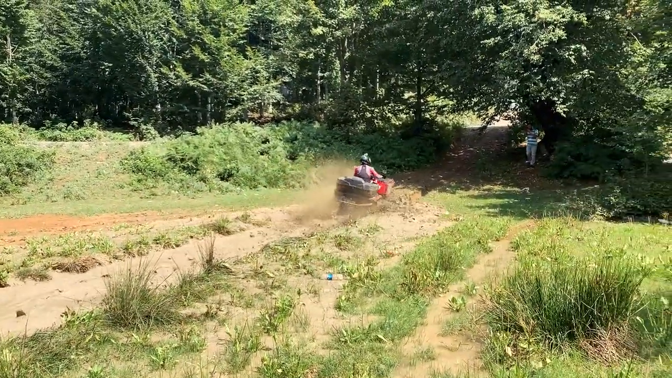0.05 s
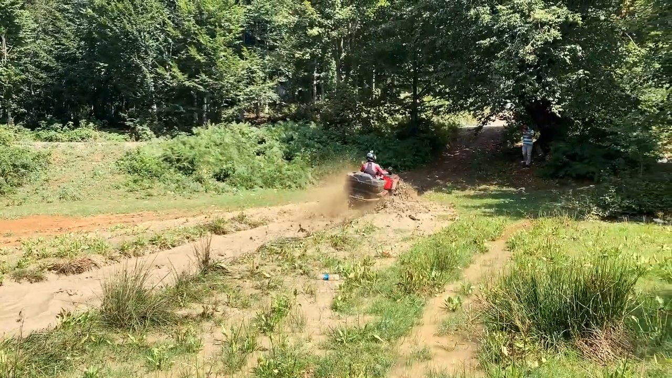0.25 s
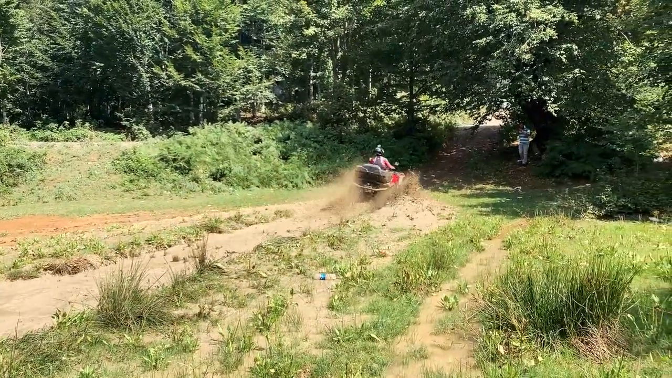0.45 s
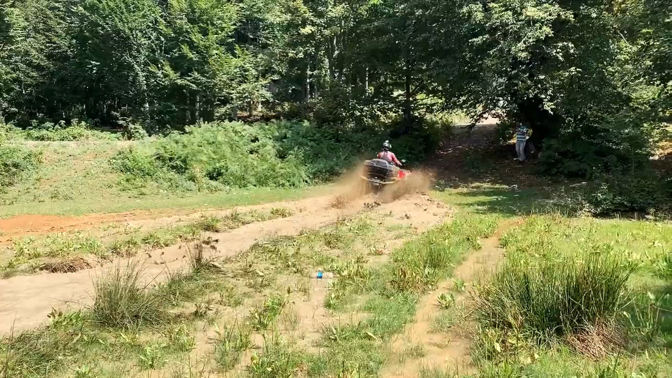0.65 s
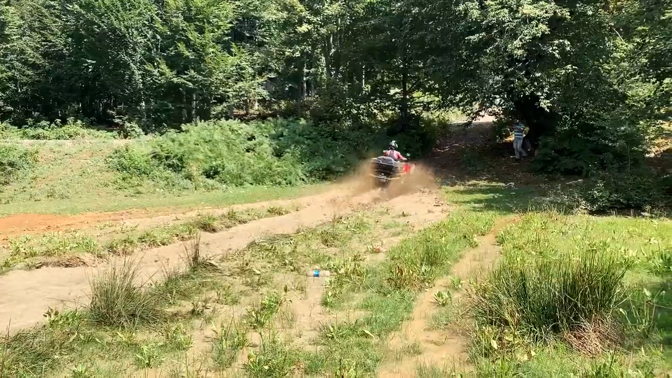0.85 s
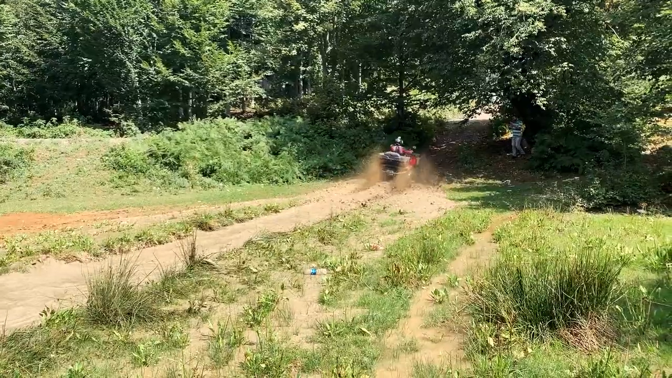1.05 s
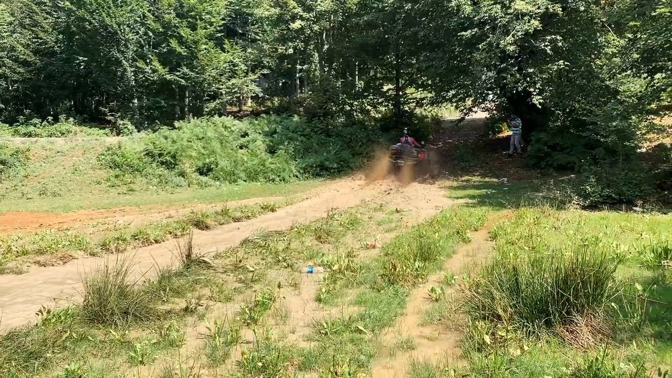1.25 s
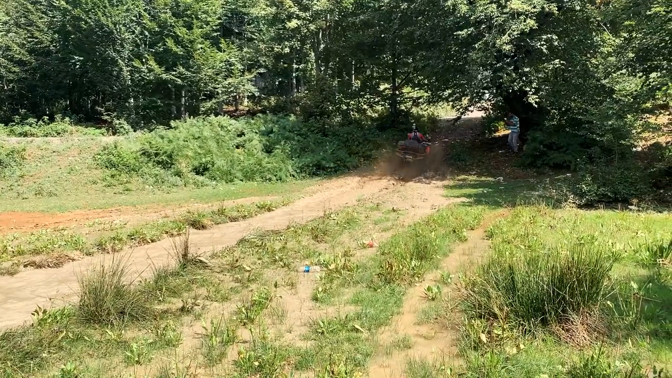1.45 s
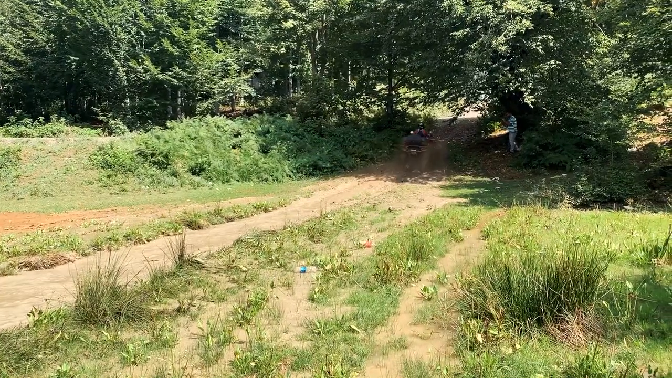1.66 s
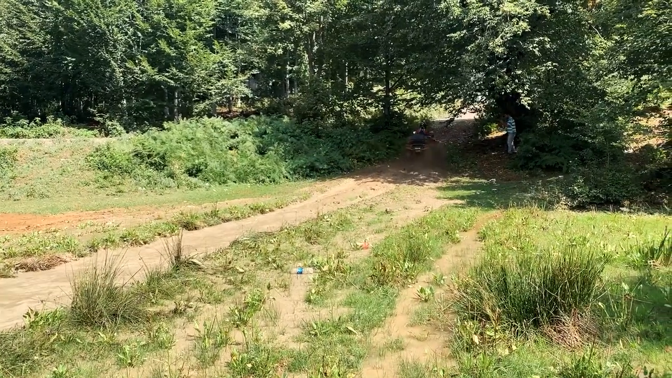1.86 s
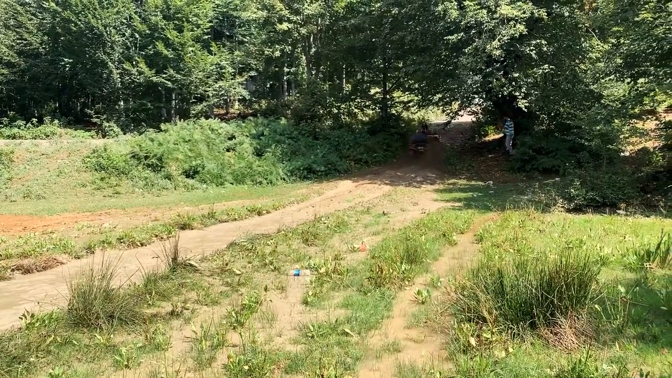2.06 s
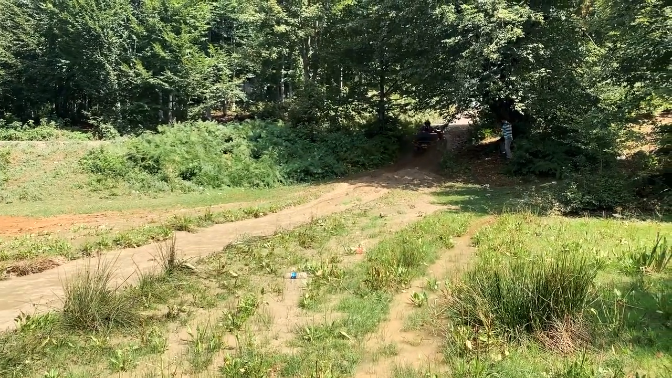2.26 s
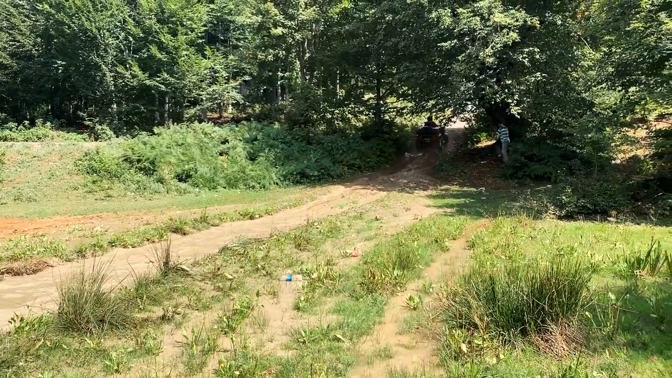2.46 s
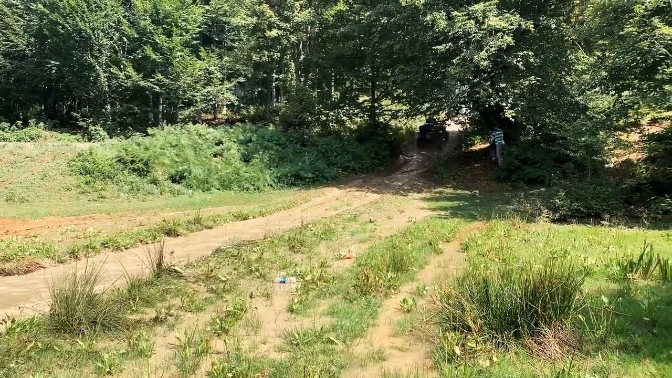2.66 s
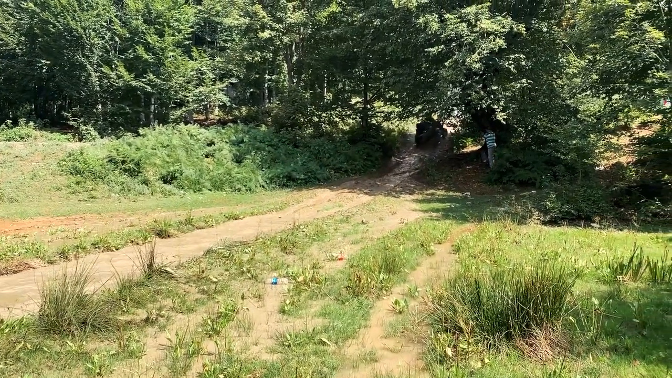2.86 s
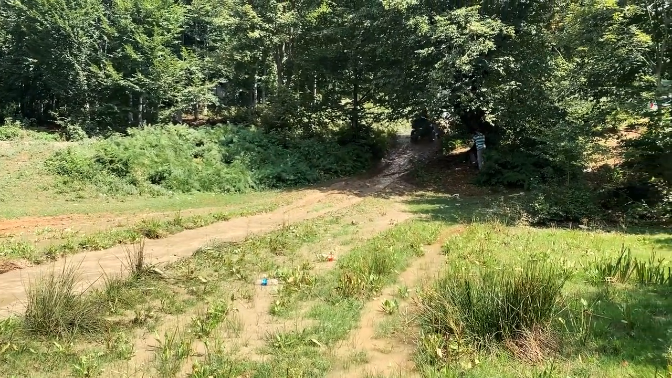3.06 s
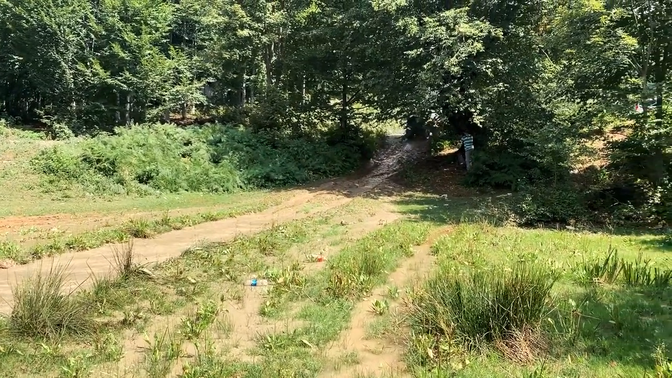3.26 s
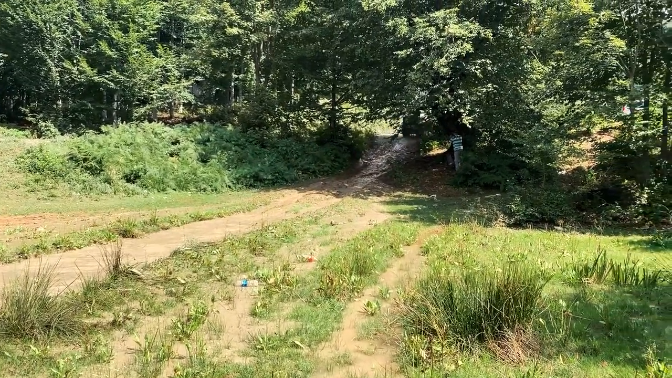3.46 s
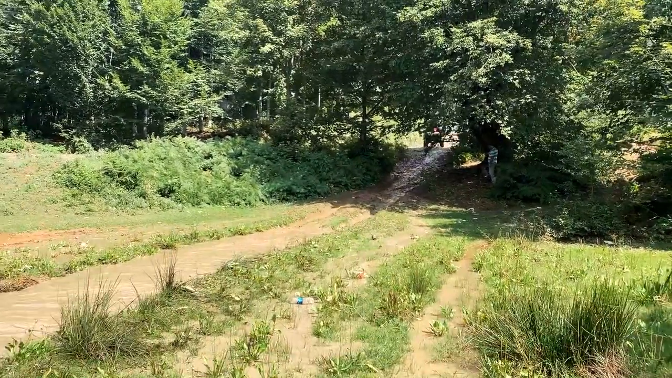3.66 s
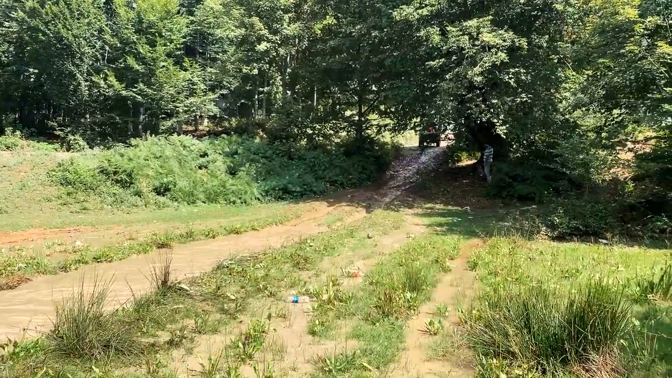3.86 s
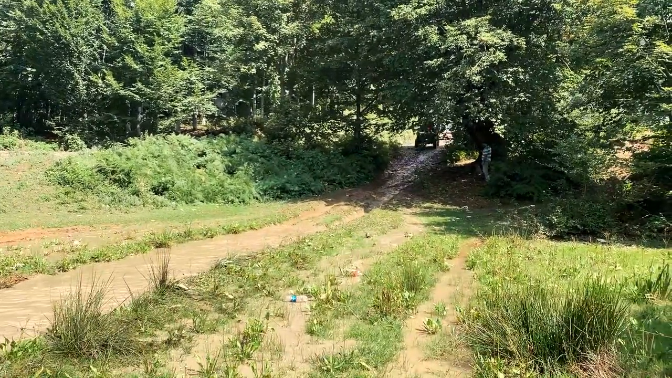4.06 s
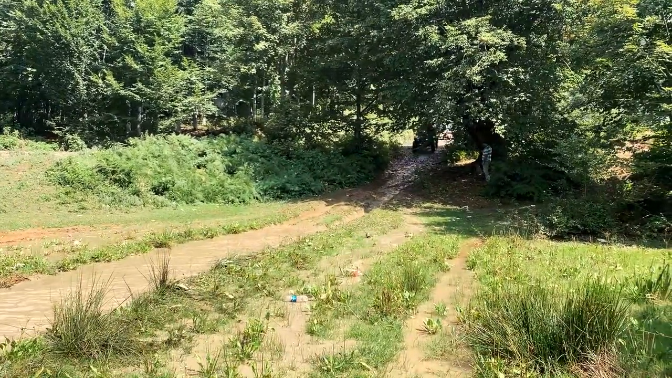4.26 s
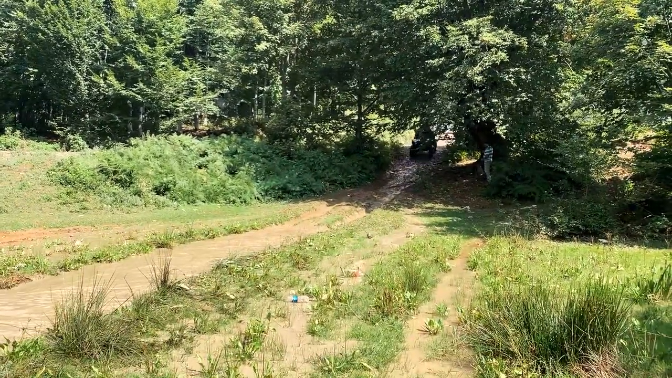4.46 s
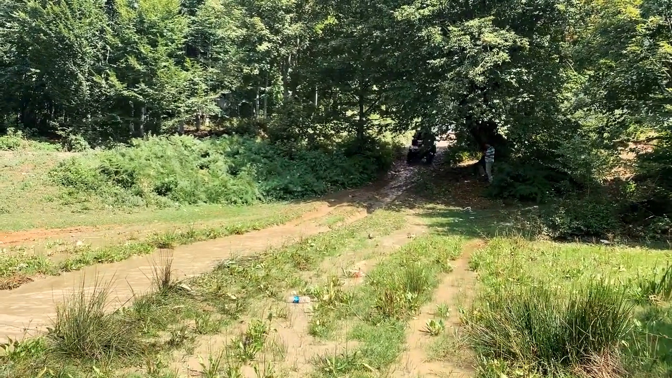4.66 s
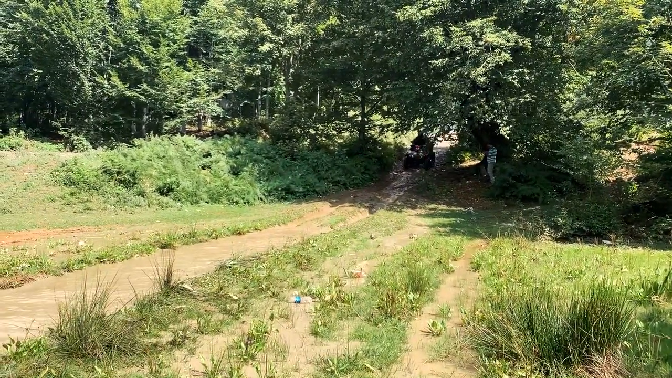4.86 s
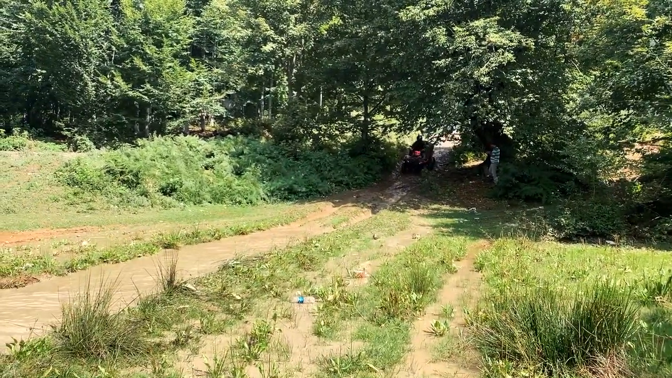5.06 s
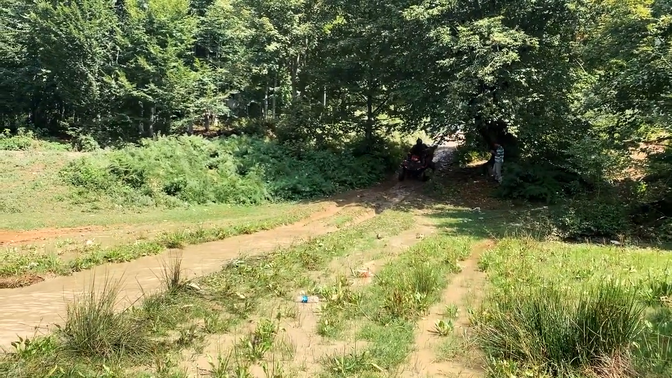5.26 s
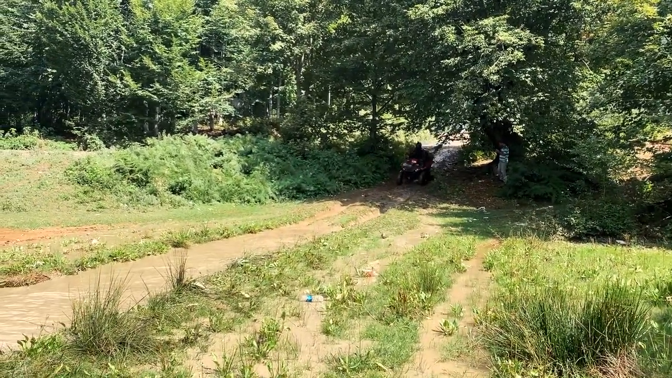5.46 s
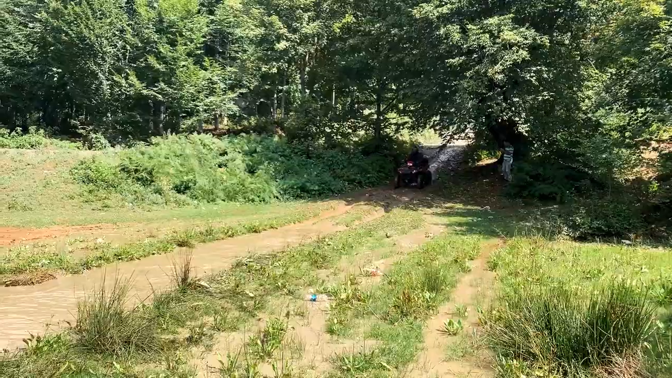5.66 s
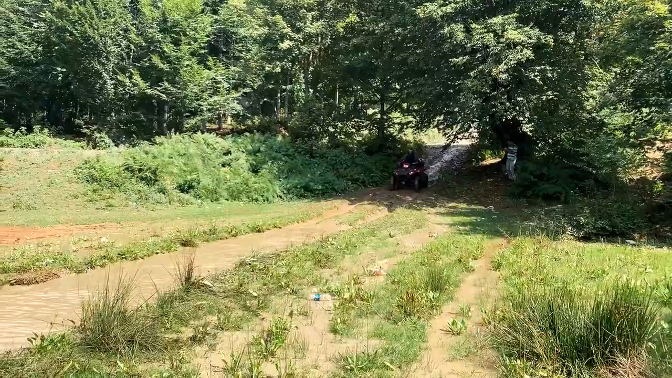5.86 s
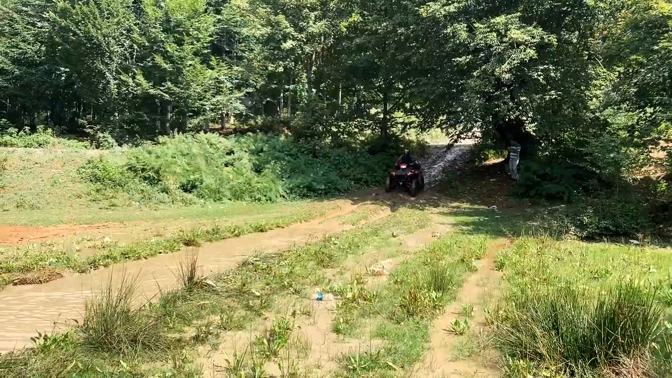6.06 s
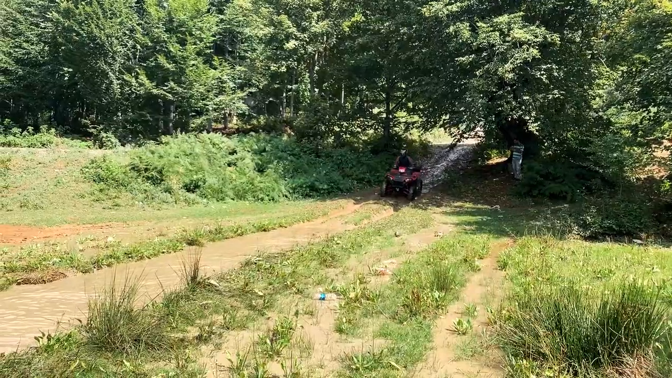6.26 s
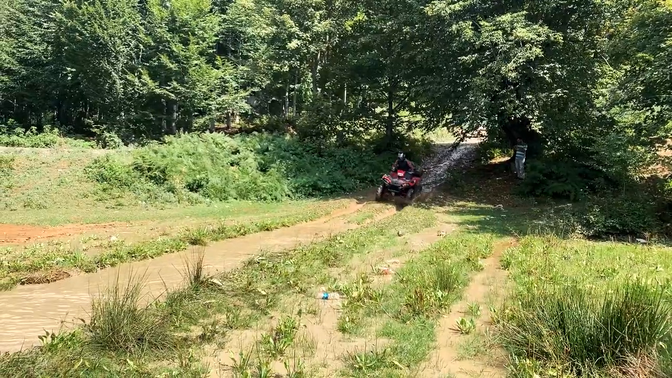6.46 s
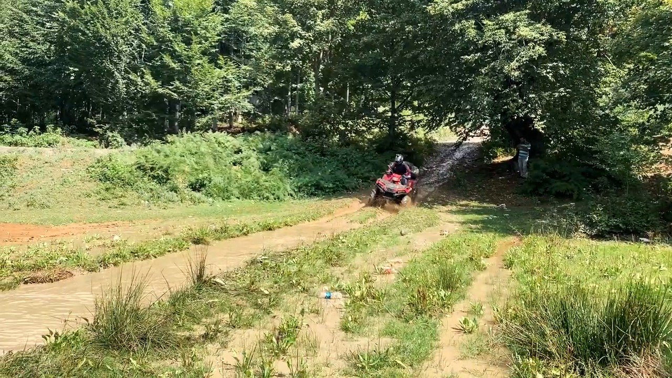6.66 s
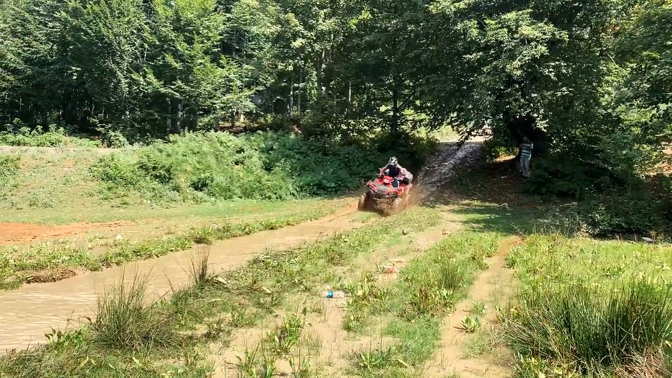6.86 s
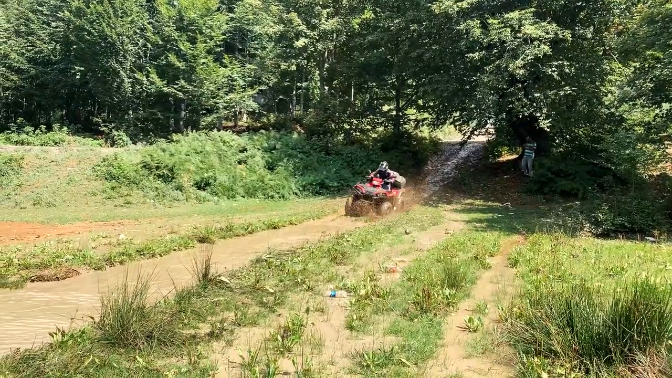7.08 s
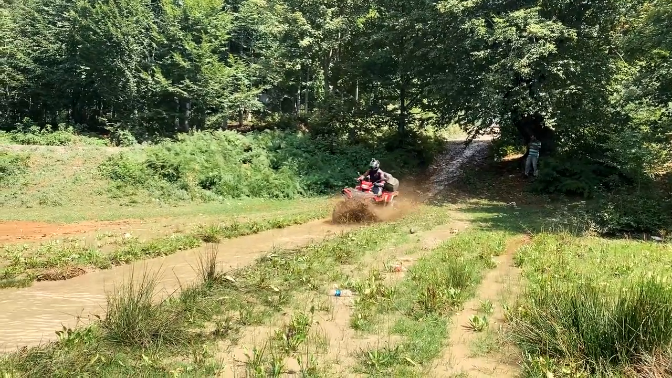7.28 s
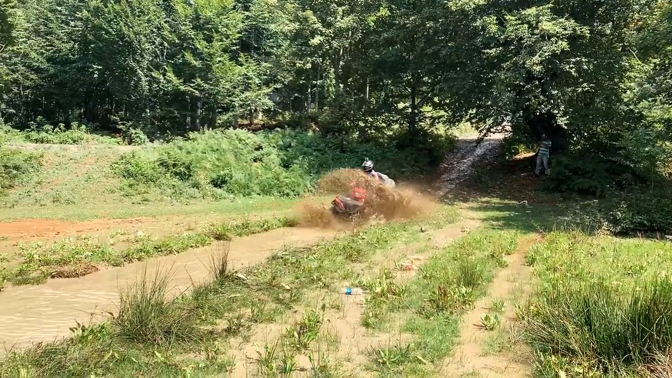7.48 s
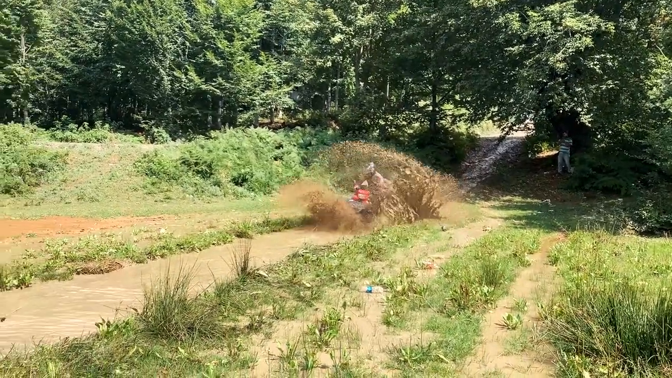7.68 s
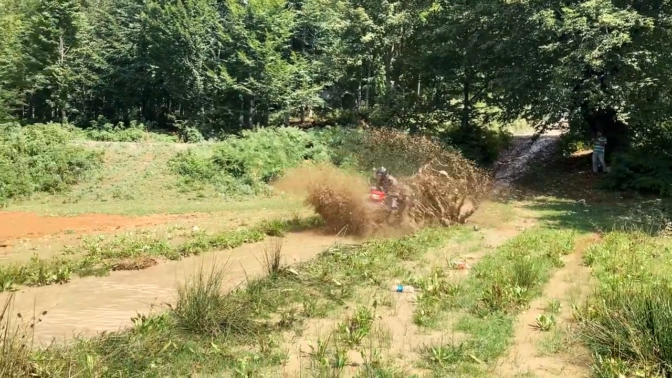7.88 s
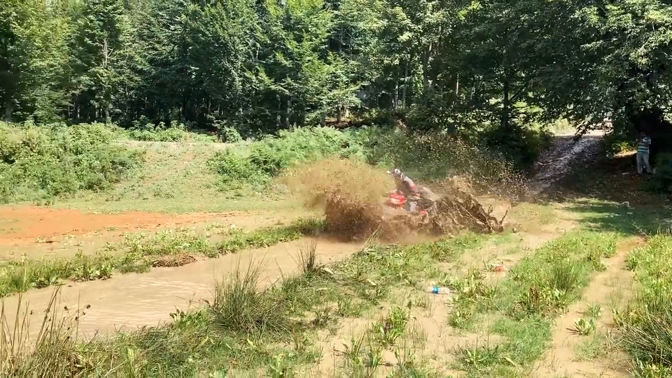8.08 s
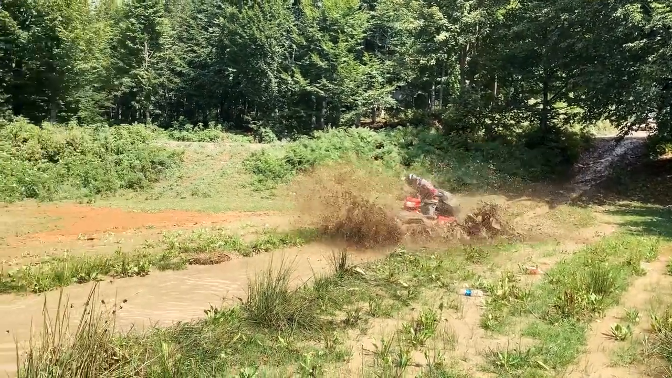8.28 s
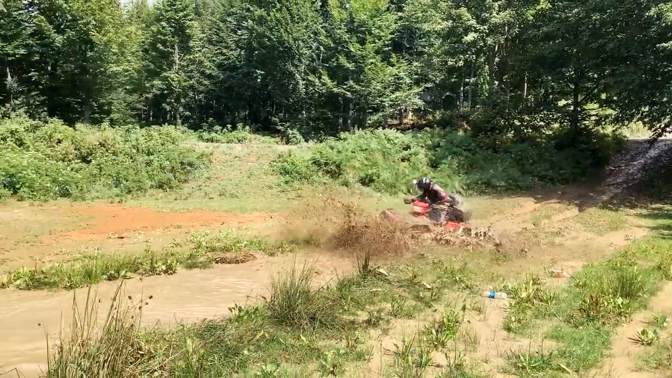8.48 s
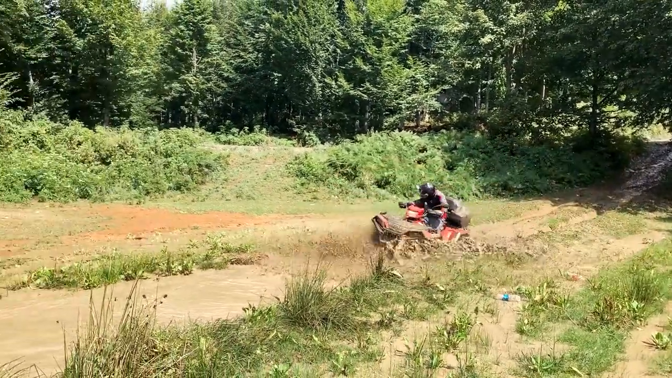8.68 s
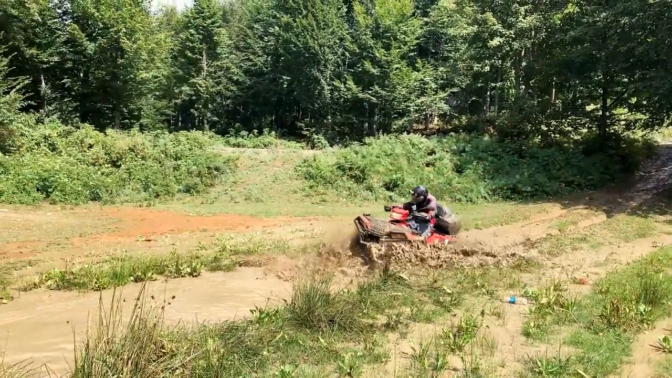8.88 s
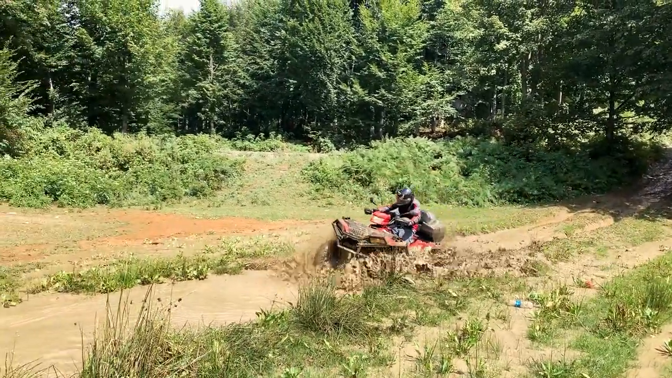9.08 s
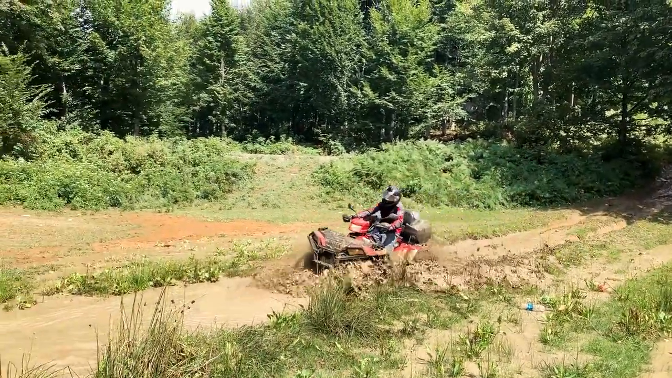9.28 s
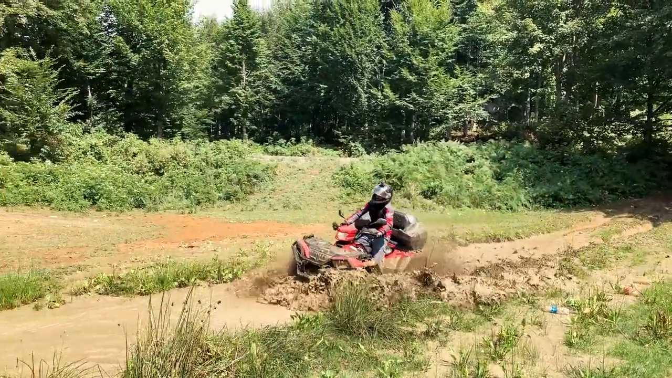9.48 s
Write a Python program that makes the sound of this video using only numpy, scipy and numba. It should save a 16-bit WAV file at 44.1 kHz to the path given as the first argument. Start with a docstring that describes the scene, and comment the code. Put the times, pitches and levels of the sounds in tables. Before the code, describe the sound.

A four-stroke, two-cylinder quad bike is heard from a phone in a forest clearing. From 0 to 1.6 s it pulls away in raspy, high-revving bursts, with barking throttle lifts near 0.5 and 1.25 s, hissing exhaust, tinny rattle and low mud churn; dull thuds fall at 1.2 and 1.6 s. Revs step down from 1.7 to 2.8 s as it recedes, with small splutters near 2.3 and 2.5 s. A distant lumpy burble follows, lifted by a short blip at 3.4 s. Slowing to near idle, it knocks at 4.2 and 4.9 s, with a short brake scrape at 4.6 s and the hardest clank at 5.1 s. It pulls steadily from 5.6 to 6.4 s, eases off with splashes, then blips sharply at 7 s. From 7.5 s it growls deeply through water, revs climbing, spray and churning mud swelling closest at 9.5 s. A faint tree echo and leafy air surround it.

```python
"""Quad bike in a muddy forest

A four-stroke quad bike with two cylinders drives off through mud, turns and comes back through a long puddle.
Its firing pulses ring the exhaust, silencer, airbox and pipe; shaped noise makes the rasp, hiss and clatter.
Decaying tones make the chassis knocks and thuds; noise and random drops make the tyres, spray and brake scrape.
A dull echo from the trees and faint air in the leaves surround it, heard through a phone's two microphones."""
import sys
import numpy as np
from scipy import signal
from scipy.fft import rfft, irfft, next_fast_len
from scipy.io import wavfile
from scipy.ndimage import uniform_filter1d, minimum_filter1d
from numba import njit

SR = 44100
rng = np.random.default_rng(int(sys.argv[2]) if len(sys.argv) > 2 else 0)


def wav_record(signal):
    """Record a signal, one row per channel, as 16-bit PCM in the file named by sys.argv[1]."""
    frames = np.transpose(np.atleast_2d(signal))
    bounded = np.clip(frames, -1, 1)
    # unit amplitude maps onto the largest positive 16-bit level
    quanta = np.round(bounded * 32767).astype(np.int16)
    wavfile.write(sys.argv[1], SR, quanta)


N = 420273
TIME = np.arange(N) / SR  # seconds

# Engine speed. Each row: time in seconds, firings of one cylinder per second.
FIRING = [(0.0, 45.4), (0.1, 44.8), (0.4, 47.4), (0.61, 39.9), (0.95, 47.4), (1.17, 49.9), (1.27, 44.9),
          (1.41, 43.5), (1.59, 47.6), (1.67, 41.0), (1.91, 35.5), (2.15, 38.7), (2.39, 33.4), (2.55, 32.6),
          (2.73, 29.1), (2.81, 26.1), (3.08, 27.0), (3.34, 26.6), (3.56, 32.8), (3.69, 28.3), (3.95, 26.9),
          (4.01, 25.7), (4.48, 23.8), (4.59, 22.0), (5.15, 21.8), (5.28, 26.6), (5.44, 30.2), (5.73, 32.2),
          (6.18, 32.5), (6.34, 31.4), (6.53, 28.1), (6.63, 28.5), (6.9, 24.6), (7.11, 34.2), (7.19, 36.5),
          (7.54, 33.0), (7.8, 44.2), (7.96, 47.0), (8.17, 40.4), (8.33, 39.6), (8.63, 48.8), (9.53, 53.2)]
# The quad drives off, turns and comes back. Each row: time in seconds, distance in metres.
DISTANCE = [(0, 32), (1.5, 43.8), (2.8, 88), (4.3, 62), (5.6, 45.7), (7, 34.2), (8.3, 22.3), (9.53, 8.7)]
IDLE_RATE, FULL_RATE = 24, 50  # firings of one cylinder per second
REFERENCE_M = 25  # distance at which the voice levels below hold
SECOND_AT = 0.3696  # the second cylinder fires this share of a cycle after the first

# Stretches of engine load, most with open throttle; opening 0 only changes the boom, drone, bark and rasp. Each
# row: start in seconds, end in seconds, throttle opening from 0 to 1, extra boom in dB, extra drone in dB,
# extra bark in dB.
LOADS = [(-.2, .42, 0.59, 0, 2, -4.5), (.63, 1.17, 0.61, 1, 3.5, 2.5), (1.34, 1.56, 0.51, 0, 3.5, 6),
         (1.92, 2.13, 0.37, -16, 1.5, 1), (2.17, 2.38, 0.22, -2.5, -1, -5), (2.58, 2.72, 0, 1, 1.5, 6.5),
         (3.35, 3.57, 0.55, 3.5, 3.5, 1.5), (5.13, 5.5, 0, -1, 2, 4), (5.55, 6.4, 0.65, 0.5, -2.5, 1),
         (6.97, 7.14, 0.95, 4.5, -2.5, 8), (7.53, 7.91, 0.67, 1.5, 1, -2.5), (8.28, 8.93, 0.45, 1.5, 1, -2),
         (8.95, 9.28, 0.12, -2.5, 1, 10.5), (9.28, 9.7, 0.25, -1.5, 0, 2.5)]
LOAD_RISE_S, LOAD_FALL_S = 0.069, 0.047
# The wheels drive the engine on a shut throttle. Each row: start in seconds, end in seconds,
# extra boom in dB, extra drone in dB, extra clatter in dB.
OVERRUNS = [(1.565, 1.686, 2.5, -2.5, 2.5), (2.748, 2.887, 6, 0.5, -1.5), (3.934, 4.553, 2.5, -2.5, 0.5),
            (4.556, 5.137, 2.5, -2.5, 1), (6.64, 6.86, 4, -1, -6)]
OVERRUN_FADE_S = 0.014
# The throttle snaps shut at high revs: the exhaust barks on, and the intake drone may dip.
# Each row: start in seconds, end in seconds, extra drone in dB, extra bark in dB.
LIFTS = [(0.44, 0.6, 0, 11), (1.24, 1.33, -3, 2), (7.96, 8.24, -4, 4.5)]
LIFT_FADE_S = 0.015
# Deep water loads the engine. Each row: start in seconds, end in seconds, extra boom in dB, extra bark in dB.
WADING = [(7.5, 8.6, 2.5, 4)]
WADING_FADE_S = 0.08
# The pipe sings under a steady pull. Each row: start in seconds, end in seconds, extra pipe tone in dB.
PULLS = [(0.28, 0.42, 6), (0.68, 1.19, 5.5), (1.36, 1.58, 2.5), (1.9, 2.3, 2.5), (5.66, 6.35, 3.5),
         (7.03, 7.25, 5), (9.08, 9.6, 4)]
PULL_FADE_S = 0.08
# The engine stumbles as it takes up or sheds the load.
# Each row: start in seconds, end in seconds, scatter of the firings in cycles.
STUMBLES = [(1.19, 1.27, 0.049), (1.58, 1.66, 0.05), (2.58, 2.74, 0.015), (5.12, 5.55, 0.028),
            (6.38, 6.6, 0.033)]

# Basic level of each voice, before the extras: dB at idle at the reference distance,
# dB added by full effort, dB added by full revs.
BOOM_DB = (-20.5, 3, 3)
DRONE_DB = (-13.5, 4.5, -2.5)
BARK_DB = (-33.5, 26, 2)
RASP_DB = (-43.5, 10.5, -3.5)
TAILPIPE_DB = (-38, 8.5, 5.5)
VALVES_DB = (-32.5, 2.5, 1.5)
PIPE_DB = (-46.5, 4, 5.5)
TIP_DB = (-59, 24, 6)
GAS_DB = (-43, 8, 7.5)
FLARE_DB = -27.5  # tailpipe crack at full revs and the widest throttle, from behind
# Bumps in the track load and unload the engine: typical swing in dB at idle, and new values per second.
BUMP_BOOM_DB, BUMP_DRONE_DB, BUMP_RATE = 1.5, 1.76, 20
# The rasp takes this share of a load's extra bark in dB, and changes by this many dB in deep water.
RASP_BARK_SHARE, WADING_RASP_DB = 0.38, -10

# Airbox resonance before the throttle shifts it. Each row: firings per second, pitch in Hz.
AIRBOX = [(22, 127.5), (26, 126.3), (29, 160), (33, 164), (37, 168), (41, 159.6), (44, 171.3), (52, 168)]
AIRBOX_THROTTLE_HZ = -13  # shift at full throttle
# Silencer resonance, near the sixth order at high revs. Each row: firings per second, pitch in Hz.
SILENCER = [(22, 259), (32, 294), (36, 279), (40, 237.5), (45, 270), (50, 299), (53, 307)]
SILENCER_WIDTH_HZ = 108
# Narrow bands follow the engine speed and weaken or lift single orders of the exhaust and intake sound.
# Each row: order (multiple of the firing rate), change from behind in dB, change from the front in dB,
# added change on overrun in dB.
ORDER_BALANCE = [(1, 0.5, -4, -9), (4, -1.5, -6.5, 0), (6, 1, 0.5, -12), (7, -2, -4, 3), (9, 3.5, 2.5, 0.5)]
ORDER_WIDTH = 0.61  # share of the firing rate
PIPE_SCATTER, PIPE_SECOND = 0.3, 0.11  # scatter of its pulses (dB), share of the second cylinder
FRONT_PIPE_DB = 0.5  # the pipe's overtones are clearer from the front
TIP_HZ, TIP_WIDTH_HZ = 1375, 150  # ring of the tailpipe's tip
SHELL_T60_S, SHELL_SHARE = 0.022, 0.57  # ring of thin metal: time to fall 60 dB, share of the sound

# Tone colour of the exhaust rasp. Each row: frequency in Hz, level in dB.
RASP_COLOUR = [(330, -70), (400, -4), (465, 17.5), (525, -1), (580, 2.5), (680, -2), (830, -17),
               (1000, -29), (1500, -83), (3000, -54)]
# Tone colour of the pipe's overtones. Each row: frequency in Hz, level in dB.
PIPE_COLOUR = [(300, -28), (360, 0.5), (410, -7), (465, 0), (520, 9), (570, -28), (630, -18), (670, -19),
               (725, 3), (810, -7.5), (880, -3.5), (1000, -9.5), (1200, -58)]
# Tone colour of the tailpipe's rattle, from behind. Each row: frequency in Hz, level in dB.
CLATTER_AWAY = [(350, 0.5), (600, -1.5), (1020, -11), (1250, -5), (1400, 2), (1550, -8.5), (1700, -4),
                (2020, -2), (2500, -4), (3100, -19), (6000, -18.5)]
# Tone colour of the valve gear, from the side. Each row: frequency in Hz, level in dB.
CLATTER_TURN = [(450, -14), (950, 1.5), (1250, 6.5), (1430, 8), (1650, -4.5), (2000, 3), (2500, 1.5),
                (3100, -28), (6000, -68)]
# Tone colour of the valve gear, from the front. Each row: frequency in Hz, level in dB.
CLATTER_FRONT = [(350, 8), (600, -1.5), (1050, -21), (1380, 1.5), (1660, -24), (1870, 2.5), (2050, -2),
                 (2250, -8), (2550, -3), (3100, -18.5), (6000, -33)]
# Tone colour of the gas jet. Each row: frequency in Hz, level in dB.
GAS_COLOUR = [(1500, -42), (2600, 0), (3100, 1), (4050, 10), (4700, 5.5), (5400, 3.5), (6400, 3),
              (7350, -2), (8150, 9), (9000, 0.5), (10100, 7.5), (11300, -4.5), (13500, -3.5), (15000, -54)]
# Tone colour of the tailpipe's crack. Each row: frequency in Hz, level in dB.
FLARE_COLOUR = [(900, -38), (1150, -7), (1350, 3.5), (1600, -5), (1850, -2), (2080, 3), (2300, -23),
                (2700, -37)]

# The tyres churn the mud. Each row: time in seconds, level in dB.
CHURN = [(0, -37.5), (1.2, -35.5), (1.3, -39), (1.7, -38.5), (1.85, -49), (2.0, -43), (2.55, -41),
         (2.72, -59), (3.3, -51), (3.5, -39), (3.67, -48.5), (4.52, -52), (4.65, -48), (5.05, -35.5),
         (6.3, -44), (6.45, -54), (6.6, -38.5), (6.98, -39), (7.1, -27.5), (7.3, -35), (8.4, -34),
         (9.53, -26)]
# Tone colour of the churned mud. Each row: frequency in Hz, level in dB.
CHURN_COLOUR = [(250, 1), (400, 0), (530, -1.5), (640, 4.5), (780, -1.5), (900, -4), (1030, -20),
                (1400, -45)]
# The wheels drop into puddles. Each row: start in seconds, end in seconds, level in dB.
SPLASHES = [(2.24, 2.3, -49), (2.438, 2.554, -44.5), (6.537, 6.615, -36.5), (6.644, 6.69, -35),
            (6.73, 6.803, -33), (8.207, 8.42, -44)]
# Tone colour of the splutter in puddles. Each row: frequency in Hz, level in dB.
SPLASH_COLOUR = [(400, -27), (750, 3), (1050, -11), (1350, 8.5), (1650, -4), (1950, 7.5), (2500, -5.5),
                 (3200, -7), (8000, -20)]
# Mud and water thrown on the way back. Each row: time in seconds, level in dB before a fixed 4 dB lift.
SPRAY = [(4.7, -52), (4.73, -53.5), (5.28, -46), (7.0, -39), (7.11, -34), (8.22, -35), (8.87, -29),
         (9.0, -36), (9.53, -28.5)]
# Tone colour of the spray. Each row: frequency in Hz, level in dB.
SPRAY_COLOUR = [(1500, 5), (2700, 0), (3200, -2.5), (4000, 3), (5200, -1.5), (6500, -0.5), (7400, -4.5),
                (8200, 1.5), (9000, -3), (10100, 2.5), (11300, -8), (13500, -4.5), (15000, -47)]
# Far spray loses its treble. Each row: frequency in Hz, change in dB.
FAR_COLOUR = [(3500, 1), (8000, -14), (13000, -19)]
NEAR_M, FAR_M = 17.4, 73.5  # full treble up to the first distance, the far colour alone from the second

# Chassis knocks over ruts. Each row: start in seconds, peak level in dB, pitch as a multiple of the modes.
KNOCKS = [(2.635, -27, 0.97), (4.238, -20, 0.95), (4.785, -30, 0.75), (4.883, -16.5, 0.98),
          (5.134, -8.5, 1.06), (5.523, -13, 1)]
# Modes that the chassis rings with. Each row: frequency in Hz, relative level in dB, seconds to fall 60 dB.
CHASSIS = [(460, 3, 0.081), (470, 14, 0.013), (620, -0.5, 0.038), (834, -12, 0.15), (1220, -10, 0.05)]
# Dull thuds of the silencer and the bodywork. Each row: start in seconds, level in dB, pitch in Hz.
THUDS = [(1.226, -4, 115), (1.621, -3, 106), (4.595, -19, 248), (5.134, -16, 232)]
THUD_T60_S = 0.068

# Tone colour of the air in the leaves. Each row: frequency in Hz, level in dB.
FOREST_COLOUR = [(25, -39), (60, -56), (200, 10), (500, -11), (1300, -28), (3000, -19.5), (8000, -29.5),
                 (15000, -73)]
# Left minus right at the two microphone ports. Each row: frequency in Hz, difference in dB.
PORT_BALANCE = [(100, -2), (280, -0.5), (500, -2), (1000, -4.5), (2000, -0.8), (4000, 0), (8000, -3.5),
                (12000, 0.5)]
# How far the left port trails the right. Each row: frequency in Hz, lag in radians.
PORT_PHASE = [(0, 0.11), (1000, 0.089), (4000, 1.33), (8000, 1.6), (12000, 1.5)]
LOW_CUT_HZ, TOP_HZ = 29, 14600
NOTCH_HZ = (11550, 12450)


def undb(db):
    """Turn decibels into a gain."""
    return 10 ** (np.asarray(db) / 20)


def curves(table):
    """Join each column of a timed table into a value per sample."""
    seconds, *columns = np.transpose(table)
    return [np.interp(TIME, seconds, column) for column in columns]


def unit(x):
    """Scale to an rms (average strength) of 1."""
    return x / np.sqrt(np.mean(x ** 2))


def steady(x, size=3500):
    """Hold the rms near 1 over a stretch of samples, leaving the faster throb within it."""
    power = uniform_filter1d(uniform_filter1d(x ** 2, size), size)
    return x / np.sqrt(power + 1e-14)


def walk(rate):
    """Smooth random wander with an rms of about 1 and the given number of new values per second."""
    step = int(SR / rate)
    stairs = np.repeat(rng.standard_normal(N // step + 1), step)
    return unit(uniform_filter1d(stairs, step)[:N])


def colour(x, points):
    """Filter by a curve of (Hz, dB) points."""
    hz, db = np.transpose(points)
    size = next_fast_len(N + 4096)
    bins = np.maximum(np.fft.rfftfreq(size, 1 / SR), 1)
    gain = undb(np.interp(np.log(bins), np.log(hz), db))
    return irfft(rfft(x, size) * gain, size)[..., :N]


@njit
def svf(x, hz, width):
    """Band-pass filter (state-variable type) whose centre and width may move."""
    out, band, low = np.empty(len(x)), 0., 0.
    for i in range(len(x)):
        g = np.tan(np.pi * hz[i] / SR)
        damping = width[i] / hz[i]
        v = (band + g * (x[i] - low)) / (1 + g * (g + damping))
        band = 2 * v - band
        low = low + 2 * g * v
        out[i] = damping * v
    return out


def cavity(x, hz, width_hz):
    """Ring a steep resonance: the band-pass twice."""
    hz, width = hz * np.ones(N), width_hz * np.ones(N)
    once = svf(x + 1e-18, hz, width)
    return svf(once, hz, width)


def air_noise(apart):
    """Stereo noise: a common part plus a part of each channel's own."""
    return unit(rng.standard_normal(N) + apart * rng.standard_normal((2, N)))


def held(table, attack_s, release_s):
    """Turn rows of (start s, end s, values..) into one control per value that rises, holds and falls."""
    out = 0
    for start, end, *values in table:
        rise = np.clip((TIME - start) / attack_s, 0, 1)
        fall = np.clip(1 - (TIME - end) / release_s, 0, 1)
        out = out + np.outer(values, rise * fall)
    return out


def strokes(cycles, uneven):
    """One pulse a cycle, each a little off in time and in size (uneven, in dB)."""
    count = np.arange(int(cycles[-1]) + 1)
    chance = rng.standard_normal((len(count), 2)) * np.interp(count, cycles, uneven)[:, None]
    at = np.interp(count + .003 * chance[:, 0], cycles, np.arange(N))
    return np.bincount(at.astype(int), undb(chance[:, 1]), N)


def puffs(cycles, length, depth):
    """A burst at the start of each cycle that dies away over a steady part."""
    return unit(1 + depth * np.exp(-(cycles % 1) / length))


def twin_puffs(cycles, length, depth, second):
    """A burst from each cylinder in quick succession, then a long gap."""
    first_burst = np.exp(-(cycles % 1) / length)
    second_burst = min(second, 1) * np.exp(-((cycles - SECOND_AT) % 1) / length)
    return unit(1 + depth * uniform_filter1d(first_burst + second_burst, size=70))


def repeating(cycles, count=400):
    """A rough pattern that returns every cycle; its timing wavers, which blurs its upper overtones most."""
    waver = .011 * walk(45)  # cycles
    return unit(np.interp((cycles + waver) % 1, np.linspace(0, 1, count), rng.standard_normal(count)))


def patter(rate, spread_db):
    """Single drops and clods at random moments (rate per second), a few much larger than the rest."""
    drops = (rng.random(N) < rate / SR) * rng.standard_normal(N)
    return unit(drops * undb(spread_db * np.minimum(rng.exponential(size=N), 5)))


def shell(x):
    """Thin metal: a short, random, decaying ring gives a noise a tinny grain."""
    t = TIME[:2048]
    ring = rng.standard_normal(len(t)) * undb(-60 * t / SHELL_T60_S)
    ring = ring[None] / np.linalg.norm(ring)
    return unit(x + SHELL_SHARE * signal.oaconvolve(x, ring, axes=1)[:, :N])


def ground_bounce(x, short_s=0.00116, long_s=0.00176, share=0.037):
    """A second path off the ground combs the treble; its lag shortens and then lengthens again."""
    lag = np.interp(TIME, [0, 4, 9.5], [long_s, short_s, long_s])
    bounce = np.array([np.interp(TIME - lag, TIME, channel) for channel in x])
    return unit(x + share * bounce)


def facing():
    """0 before the quad swings its front towards the phone, 1 once it has."""
    return np.interp(TIME, [4.4, 4.8], [0, 1])


def loudness(law, effort, revs):
    """Level of a voice in dB: it changes with effort and revs and falls with distance."""
    idle_db, effort_db, revs_db = law
    metres, = curves(DISTANCE)
    return idle_db + effort_db * effort + revs_db * revs - 20 * np.log10(metres / REFERENCE_M)


def engine(cycles, firing_hz, throttle, revs):
    """The two cylinders fire in a limping pair that rings three cavities; pipe tones and gas rasp join in."""
    boom_db, drone_db, bark_db, airbox_hz = voicing(firing_hz, throttle, revs)
    rasp_db = rasp_level(throttle, revs)
    uneven = .9 - .3 * revs
    # the second pulse comes earlier at high revs, which changes the orders that the pair reinforces
    second_at = SECOND_AT - 0.0094 * revs ** 3
    first = unit(strokes(cycles, uneven))
    second = unit(strokes(cycles - second_at, uneven))
    turbulence = undb(-25) * rng.standard_normal(N)
    exhaust = first + (.85 - 0.61 * revs) * second + turbulence
    intake = second + 0.53 * first + turbulence

    boom = cavity(exhaust, 72 + 15 * revs, 46 + 36 * revs)
    boom = steady(colour(boom, [(25, -5), (42, 1.5), (105, 0.5), (150, -12.5)]))

    drone = cavity(intake, airbox_hz, 48 + 42 * np.sqrt(revs))
    drone = steady(colour(drone, [(70, 14.0), (105, 10.0), (190, 4.5), (240, 7.5), (300, -2.0), (380, -31)]))

    silencer_hz = np.interp(firing_hz, *np.transpose(SILENCER))
    bark = cavity(exhaust, silencer_hz, SILENCER_WIDTH_HZ)
    bark = steady(colour(bark, [(195, -5.0), (245, 10.0), (310, 6), (350, 0), (400, -12.5)]))

    rough = .5 * exhaust + .55 * air_noise(apart=.6)
    rough = rough * twin_puffs(cycles, length=0.25, depth=3.0, second=0.8)
    rasp = steady(colour(rough, RASP_COLOUR))

    body = boom * undb(boom_db) + drone * undb(drone_db) + bark * undb(bark_db)
    return order_balance(body, firing_hz) + pipe_tones(cycles, throttle, revs) + rasp * undb(rasp_db)


def voicing(firing_hz, throttle, revs):
    """How throttle, load, deep water and bumps set the boom, drone and bark (dB) and the airbox pitch (Hz)."""
    _, load_boom, load_drone, load_bark = held(LOADS, LOAD_RISE_S, LOAD_FALL_S)
    overrun_boom, overrun_drone, _ = held(OVERRUNS, OVERRUN_FADE_S, OVERRUN_FADE_S)
    lift_drone, lift_bark = held(LIFTS, LIFT_FADE_S, LIFT_FADE_S)
    water_boom, water_bark = held(WADING, WADING_FADE_S, WADING_FADE_S)
    boom_db = loudness(BOOM_DB, throttle, revs) + load_boom + overrun_boom + water_boom
    drone_db = loudness(DRONE_DB, throttle, revs) + load_drone + overrun_drone + lift_drone
    bark_db = loudness(BARK_DB, throttle * revs, revs) + load_bark + water_bark + lift_bark
    airbox_hz = np.interp(firing_hz, *np.transpose(AIRBOX)) + AIRBOX_THROTTLE_HZ * throttle
    jolt = 1 - .6 * revs  # bumps matter most at low revs
    boom_db = boom_db + BUMP_BOOM_DB * jolt * walk(BUMP_RATE)
    drone_db = drone_db + BUMP_DRONE_DB * jolt * walk(BUMP_RATE)
    return boom_db, drone_db, bark_db, airbox_hz


def rasp_level(throttle, revs):
    """Level of the exhaust rasp in dB: it follows the extra bark of each load and is muffled in deep water."""
    load_bark = held(LOADS, LOAD_RISE_S, LOAD_FALL_S)[3]
    water = held(WADING, WADING_FADE_S, WADING_FADE_S)[0]
    wet_db = WADING_RASP_DB * water / water.max()
    return loudness(RASP_DB, throttle, revs) + RASP_BARK_SHARE * load_bark + wet_db


def order_balance(x, firing_hz):
    """Narrow bands that follow the engine speed weaken or lift single orders."""
    gates = [(start, end, 1) for start, end, *_ in OVERRUNS]
    overrun, = held(gates, OVERRUN_FADE_S, OVERRUN_FADE_S)
    for order, behind_db, front_db, overrun_db in ORDER_BALANCE:
        db = behind_db * (1 - facing()) + front_db * facing() + overrun_db * overrun
        x = x + (undb(db) - 1) * cavity(x, round(order) * firing_hz, ORDER_WIDTH * firing_hz)
    return x


def pipe_tones(cycles, throttle, revs):
    """Nearly even pulses, mostly from one cylinder, ring the standing waves of the pipe."""
    uneven = np.full(N, PIPE_SCATTER)
    pulses = strokes(cycles, uneven) + PIPE_SECOND * strokes(cycles - SECOND_AT, uneven)
    pull_db, = held(PULLS, PULL_FADE_S, PULL_FADE_S)
    pipe_db = loudness(PIPE_DB, throttle, revs) + FRONT_PIPE_DB * facing() + pull_db
    return steady(colour(pulses, PIPE_COLOUR)) * undb(pipe_db)


def clatter(cycles, throttle, revs):
    """The tailpipe rattles with each firing, then, from side and front, the valve gear on each crank turn."""
    _, _, overrun_db = held(OVERRUNS, OVERRUN_FADE_S, OVERRUN_FADE_S)
    rattle = shell(air_noise(apart=.7) + .7 * repeating(cycles)) * undb(.3 * walk(70))
    tailpipe = rattle * twin_puffs(cycles, length=.15, depth=.8 + 13 * throttle ** 2, second=.6)
    valves = rattle * puffs(2 * cycles, length=0.6, depth=0.75)  # a cycle is two crank turns
    away = steady(colour(tailpipe, CLATTER_AWAY), size=9000)
    side = steady(colour(valves, CLATTER_TURN), size=9000)
    front = steady(colour(valves, CLATTER_FRONT), size=9000)
    leaving = np.interp(TIME, [2.6, 3.0], [1, 0])
    behind = np.sqrt(leaving) * away + np.sqrt(1 - leaving - facing()) * side
    behind = behind * undb(loudness(TAILPIPE_DB, throttle, revs))
    ahead = np.sqrt(facing()) * front * undb(loudness(VALVES_DB, throttle, revs))
    # each firing also rings the tailpipe's tip
    uneven = np.full(N, .2)
    pulses = strokes(cycles, uneven) + 1.2 * strokes(cycles - SECOND_AT, uneven)
    tip = steady(cavity(pulses, TIP_HZ, TIP_WIDTH_HZ))
    tip = tip * undb(loudness(TIP_DB, throttle, revs)) * leaving
    return (behind + ahead + tip) * undb(overrun_db)


def gas(cycles, throttle, revs):
    """The tailpipe jet hisses with each firing until the quad turns."""
    bursts = twin_puffs(cycles, length=.17, depth=.6 + 5 * throttle ** 2, second=.45)
    jet = shell(air_noise(apart=.7)) * bursts * undb(1.1 * walk(60))
    aimed = np.interp(TIME, [3.6, 3.65], [1, 0])
    return ground_bounce(colour(jet, GAS_COLOUR)) * undb(loudness(GAS_DB, throttle, revs)) * aimed


def flare(cycles, throttle, revs):
    """Near the top of the revs each firing cracks out of the tailpipe, heard only from behind."""
    cracks = air_noise(apart=.5) + .8 * repeating(cycles)
    cracks = cracks * twin_puffs(cycles, length=.14, depth=10, second=.8)
    strength = throttle / throttle.max() * revs ** 8 * (1 - facing())
    return steady(colour(cracks, FLARE_COLOUR)) * undb(FLARE_DB) * strength


def tyres():
    """The treads churn the mud with a low, grainy slosh, and splutter where they drop into a puddle."""
    churn_db, = curves(CHURN)
    slosh = air_noise(apart=0.4) * undb(2.6 * walk(30)) + 0.17 * patter(900, spread_db=7.0)
    churn = unit(colour(slosh, CHURN_COLOUR))
    wet = air_noise(apart=0.86) * undb(2.0 * walk(120)) + patter(700, spread_db=2.5)
    splutter = unit(colour(wet, SPLASH_COLOUR))
    gains = [(start, end, undb(db)) for start, end, db in SPLASHES]
    splash, = held(gains, 0.012, 0.043)
    return churn * undb(churn_db) + splutter * splash


def spray():
    """A wash of thrown water with single drops and clods pattering in it, duller when far away."""
    spray_db, = curves(SPRAY)
    metres, = curves(DISTANCE)
    wash = air_noise(apart=.6) * undb(walk(35)) + 0.26 * patter(1500, spread_db=0.5)
    returning = np.interp(TIME, [3.62, 3.72], [0, 1])
    near = ground_bounce(colour(wash, SPRAY_COLOUR))
    far = np.interp(metres, [NEAR_M, FAR_M], [0, 1])
    blend = (1 - far) * near + far * colour(near, FAR_COLOUR)
    return blend * undb(spray_db + 4.0) * returning


def knocks():
    """The suspension bottoms out and rings the chassis: decaying tones that start together."""
    out, t = np.zeros(N), TIME[:SR // 4]
    for s, db, pitch in KNOCKS:
        ring = sum(undb(mode_db - 60 * t / t60) * np.sin(2 * np.pi * hz * pitch * t)
                   for hz, mode_db, t60 in CHASSIS)
        start = int(s * SR)
        out[start:start + len(t)] -= undb(db) * ring / np.abs(ring).max()
    return out


def thuds():
    """Each thud is a low tone that swells over one swing and dies away quickly."""
    out, t = np.zeros(N), TIME[:SR // 4]
    for s, db, hz in THUDS:
        start = int(s * SR)
        tone = np.sin(2 * np.pi * hz * t) * np.minimum(t * hz, 1)
        out[start:start + len(t)] += undb(db - 60 * t / THUD_T60_S) * tone
    return out


def brake(hz=1980, scrape_db=-36, sing_db=-53.5):
    """A short scrape as the brake bites on the slope, then the disc sings faintly with an unsteady pitch."""
    bite = np.interp(TIME, [4.585, 4.598, 4.612, 4.64], [0, 1, .8, 0])
    pressed = np.interp(TIME, [4.59, 4.6, 5.17, 5.21], [0, 1, 1, 0])
    scrape_colour = [(200, -38), (700, -2), (2000, 0), (3500, -16), (9000, -21), (14000, -38)]
    scrape = unit(colour(air_noise(apart=0.1), scrape_colour))
    sing = unit(np.sin(2 * np.pi * np.cumsum(hz + 14 * walk(170)) / SR))
    return undb(scrape_db) * bite * scrape + undb(sing_db) * pressed * sing


def tree_echo(x, t60=1.0, echo_db=-20):
    """Trunks and foliage scatter a late, dull echo: the sound smeared by a decaying tail of noise."""
    t = TIME[:SR]
    tail = rng.standard_normal((2, SR)) * undb(-60 * t / t60) * np.clip(t / 0.28, 0, 1)
    tail /= np.sqrt(np.sum(tail ** 2, axis=1, keepdims=True))
    echo = signal.fftconvolve(x, tail, axes=1)[:, :N]
    return undb(echo_db) * colour(echo, [(150, 3.5), (600, 8.6), (2000, 7.6), (9000, 5.3)])


def forest():
    """Faint air in the leaves: soft noise whose level wanders slowly around -45 dB."""
    return unit(colour(air_noise(apart=0.14), FOREST_COLOUR)) * undb(-45 + walk(1.6))


def scene():
    """The quad, its echo and the clearing."""
    firing_hz, = curves(FIRING)
    stumble, = held(STUMBLES, 0.0405, 0.039)
    cycles = np.cumsum(firing_hz) / SR + stumble * walk(35)
    revs = np.clip((firing_hz - IDLE_RATE) / (FULL_RATE - IDLE_RATE), 0, 1)
    throttle = np.clip(held(LOADS, LOAD_RISE_S, LOAD_FALL_S)[0], 0, 1)
    motor = engine(cycles, firing_hz, throttle, revs) + clatter(cycles, throttle, revs)
    motor = motor + gas(cycles, throttle, revs) + flare(cycles, throttle, revs)
    quad = motor + tyres() + spray() + knocks() + thuds() + brake()
    return quad + tree_echo(quad) + forest()


def record(dry):
    """Two ports a little apart; the phone eases loud peaks, dips in the high treble and cuts both ends."""
    phase = np.interp(np.fft.rfftfreq(N, 1 / SR), *np.transpose(PORT_PHASE))
    left = irfft(rfft(dry[0]) * np.exp(-1j * phase), N)
    # each port takes half of the level difference
    left = colour(left, [(hz, db / 2) for hz, db in PORT_BALANCE])
    right = colour(dry[1], [(hz, -db / 2) for hz, db in PORT_BALANCE])
    ports = np.array([left, right])
    # a limiter eases the gain down around each peak that would overload
    safe_gain = np.minimum(1, .9 / (np.abs(ports).max(axis=0) + 1e-9))
    ports = ports * uniform_filter1d(minimum_filter1d(safe_gain, 900), 900)
    ports = signal.sosfilt(signal.butter(4, LOW_CUT_HZ, "highpass", fs=SR, output="sos"), ports)
    ports = signal.sosfilt(signal.butter(2, NOTCH_HZ, "bandstop", fs=SR, output="sos"), ports)
    return signal.sosfilt(signal.ellip(8, .2, 70, TOP_HZ, fs=SR, output="sos"), ports)


dry = scene()
out = record(dry)
wav_record(out)
```